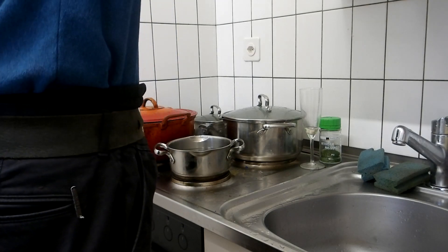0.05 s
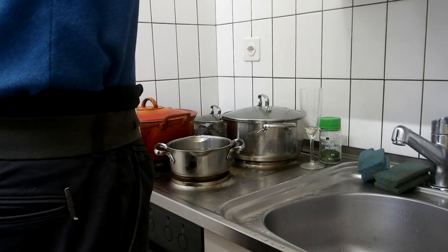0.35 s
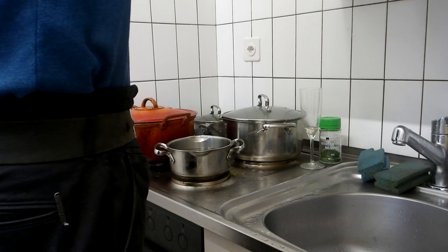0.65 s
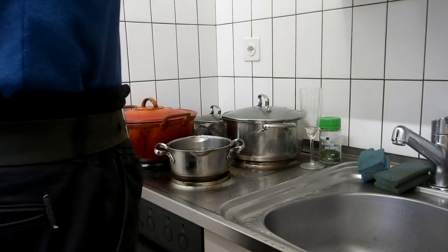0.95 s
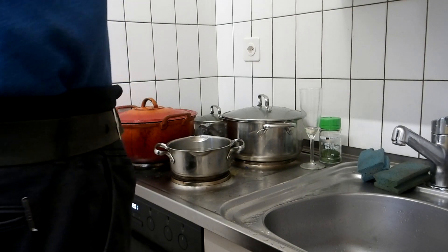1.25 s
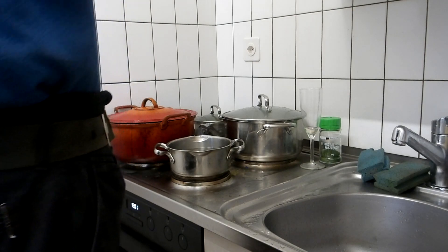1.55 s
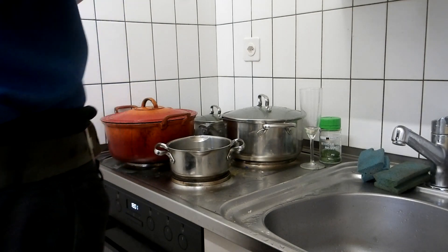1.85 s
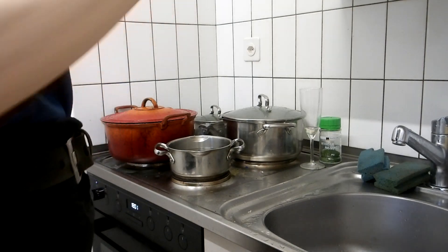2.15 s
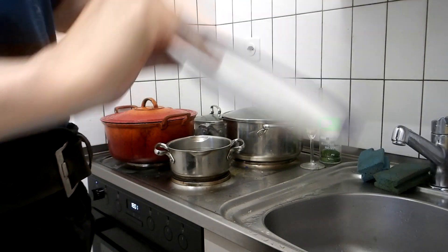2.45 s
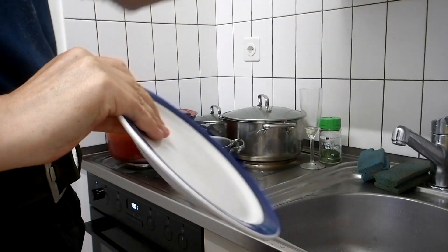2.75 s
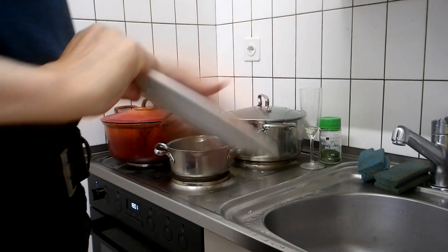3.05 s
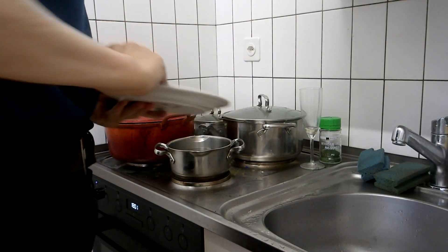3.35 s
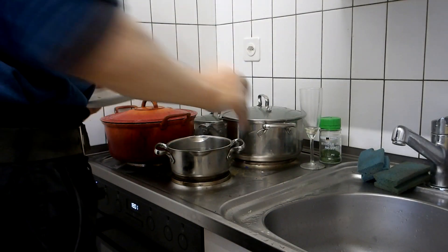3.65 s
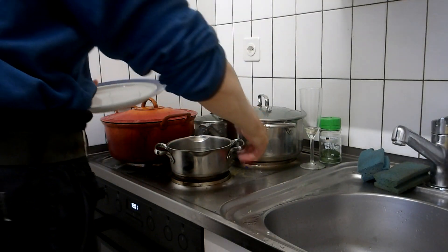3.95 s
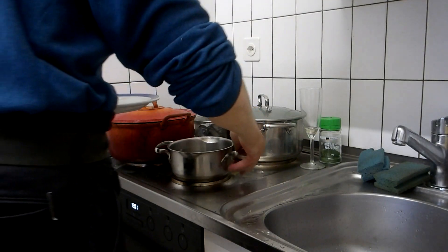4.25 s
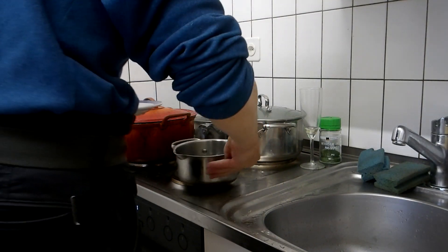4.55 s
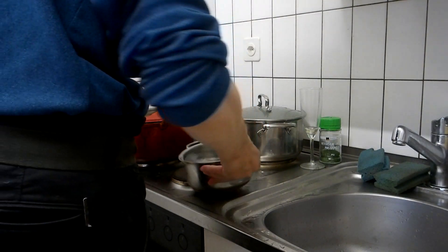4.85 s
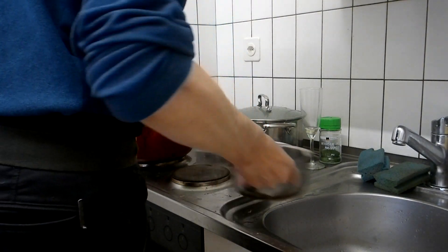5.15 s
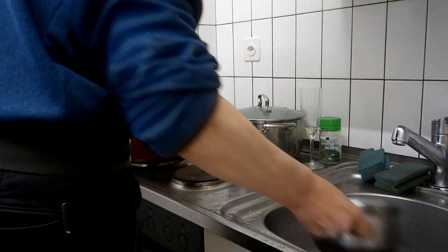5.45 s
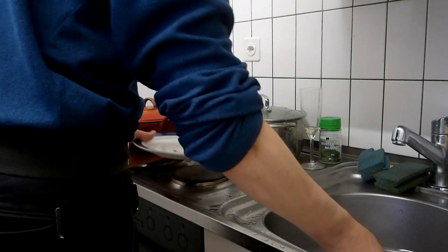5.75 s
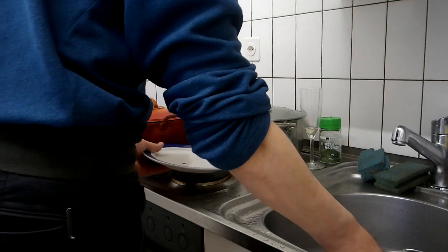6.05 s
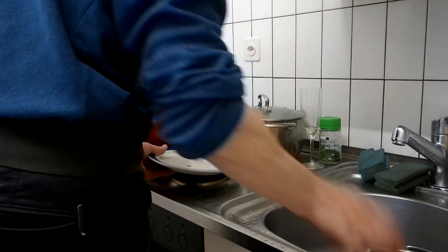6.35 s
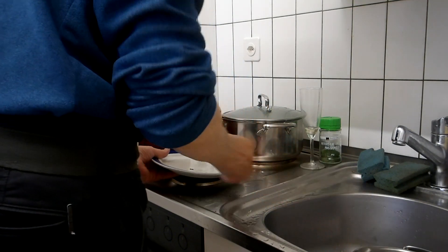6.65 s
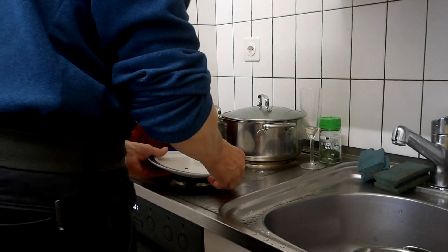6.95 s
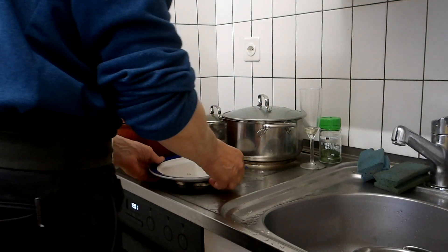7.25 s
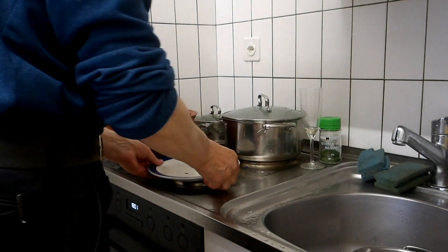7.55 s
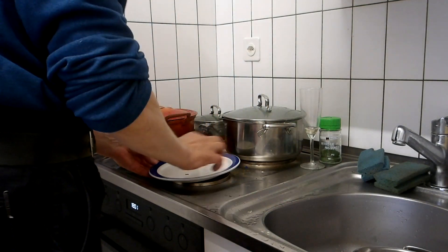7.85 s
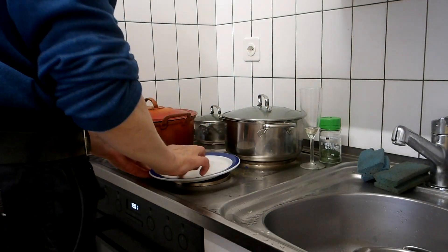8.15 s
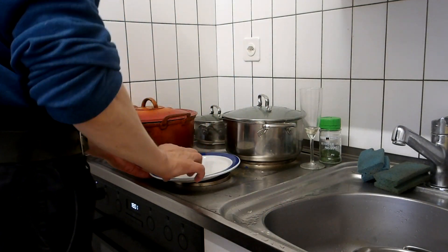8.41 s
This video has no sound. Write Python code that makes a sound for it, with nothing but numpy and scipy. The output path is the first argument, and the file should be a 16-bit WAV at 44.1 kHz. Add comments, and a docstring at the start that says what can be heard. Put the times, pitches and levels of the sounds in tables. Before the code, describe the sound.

Crockery clatters in a tiled kitchen, a dragged pot bangs into a steel sink, and a plate knocks and slides on the stovetop.

```python
"""Crockery and steel in a tiled kitchen

Dishes clink as a plate is taken out and a cupboard shuts; a steel pot is dragged off the stove and
clatters into the sink; the plate is knocked and slid onto the stovetop. Impacts excite free vibration
of each object's modes, friction drives the scrapes and a sleeve's rustle, and the tiles prolong both.
Hiss and faint ticks lie beneath, and the loudest blows overload the microphone."""
import sys
import numpy as np
from scipy import signal
from scipy.fft import rfft, irfft, next_fast_len
from scipy.io import wavfile

SR = 44100
rng = np.random.default_rng(int(sys.argv[2]) if len(sys.argv) > 2 else 0)


def bounce(signal):
    """Save signal as a 16-bit WAV file at the path given by the first command-line argument."""
    frames = np.transpose(np.atleast_2d(signal))
    limited = np.clip(frames, -1, 1)
    pcm = np.round(limited * 32767).astype(np.int16)
    wavfile.write(sys.argv[1], SR, pcm)


N = 382788
TIME = np.arange(N) / SR
RING_TIME = np.arange(2 ** 15) / SR

# Impacts on each object: start_s, relative_level_db, tilt_db_per_octave, clack_over_ring_db, chatter_s
STACK_IMPACTS = [(0.0, -15.5, 1, 3, .01), (.036, -0.5, 1, 4.5, 0.013), (.075, -10.5, 2.5, -5.5, 0.017),
                 (.2975, 0, 2.5, 4, 0.0098), (.395, -13.5, -3.5, -1.5, 0.0056), (.475, -10, 2.5, 3, .03),
                 (.569, -7.5, 2.5, 4, 0.011), (.620, -9.5, -0.5, 9.5, 0.025), (.882, -33.5, 4, 17, 0.0026)]
DISH_IMPACTS = [(1.0615, -27.5, 2, -10, 0.0029), (1.0925, 1.5, -1, 3, 0.0029),
                (1.1885, -5, -3.5, 2, 0.0083)]
CUPBOARD_IMPACTS = [(.03, -7.5, 0, 5, 0.011), (.4502, -2, -0.5, 12, .004), (.485, -4.5, 11.5, -28, 0.0135),
                    (.93, -24.5, -6, 8, 0.044), (1.0618, -7, -3.5, 12, 0.00926),
                    (1.095, -17, -5, -14, 0.0062), (2.812, -5, 0, 0, .012), (2.83, -11, -11, 1, 0.015),
                    (3.183, -29.5, 2, 4, .03)]
CATCH_IMPACTS = [(2.7915, -8.5, 0, 15, .002), (2.7946, -21, 2.1, 12, 0.00057), (2.803, -8, 0, 12, 0.019)]
POT_IMPACTS = [(4.088, -30, -4.5, 4, 0.0059), (4.195, -18, -5.5, 0.5, .03), (4.255, -21.5, -6.5, 14, 0.018),
               (4.395, -24.5, 3, 19, 0.0098), (4.847, -18, 0, 2, 0.019), (4.885, -38, -6, -2, 0.027)]
SINK_IMPACTS = [(5.7364, 6.5, 2.9, 8, .007), (5.763, 1, -1, 6.3, 0.013), (5.844, -1, 0.7, 8.2, 0.014),
                (5.891, -0.5, 1.3, 2.7, .022), (6.051, -12.5, -2.5, 10.5, .02),
                (6.11, -9.5, 1.3, 4.6, 0.028), (6.185, -5.5, -2.7, 9, 0.0068),
                (6.215, -10, 1.4, 5.2, 0.023)]
PLATE_IMPACTS = [(6.7095, -3.5, -1.2, 2.6, .012), (6.85, -18, -4.5, 6.2, 0.017),
                 (7.1918, 1.5, 1.6, 3.7, 0.0048), (7.8132, 1.5, 1.2, 0.95, .002),
                 (7.858, -11.5, 0, 8.6, 0.0054)]

# Distinct normal modes of each object: pitch_hz, relative_level_db, t60_s
STACK_RESONANCES = [(536, -11, 0.51), (916, -7, 1), (1133, -7, 1), (1510, -25, 0.73), (1625, -8, 1),
                    (1940, -24, 0.4), (2613, 12, 0.083), (2545, 6, 0.071), (2950, 4, 0.26),
                    (3100, -7, 0.24), (3330, -12, 0.24), (3530, -39, .3), (3700, -26, .3), (4060, 6, 0.067),
                    (3900, 2, 0.24), (5440, 0, 0.061), (6050, 1.5, 0.11), (6420, -25, 0.39),
                    (7400, -6, 0.47), (7520, -1.5, 0.18), (9180, -9, 0.13), (9740, -13, 0.25),
                    (10520, -22, 0.5), (12200, -29, .3), (12810, -41, .25)]
DISH_RESONANCES = [(1040, -31, .2), (1270, 2.5, 0.026), (1500, -4.5, 0.12), (1646, -6.5, 0.24),
                   (1935, -4, 0.058), (2620, -7, 0.072), (2638, 7, 0.1), (3050, -21, 0.16),
                   (3904, 0.5, 0.11), (4053, -8, 0.05), (5260, -9.5, 0.18), (5660, -38, .15),
                   (6600, -12, 0.53), (6860, -8, 0.38), (8500, -27, 0.23), (9180, -15, 0.3),
                   (11400, -32, .2)]
CUPBOARD_RESONANCES = [(93.5, -13.5, 0.23), (147, -9, 0.54), (187.5, 0.5, 0.16), (197, 5.5, 0.05),
                       (287.5, -6.5, 0.14), (336, -8, 0.39), (408, -4, 0.054), (549, -18, 0.24)]
CATCH_RESONANCES = [(6000, -2, 0.0073), (6760, 0, 0.0096)]
POT_RESONANCES = [(455, -8, 0.33), (689, -1, 0.22), (825, 2, 0.1), (1046, -1, 0.22), (1360, 3.5, 0.11),
                  (1487, -5, 0.11), (1604, 6, 0.082), (1817, -1, 0.073), (2257, 4.5, 0.067),
                  (3380, -5, 0.17), (6650, -6, 0.12)]
SINK_RESONANCES = [(105.4, -6.5, 0.17), (152, -8, 0.12), (181, -1, 0.09), (286, -10.5, .2),
                   (343.4, -5, 0.33), (430, -3, 0.54), (528, -3.5, 0.22), (587, -21, .15),
                   (616.5, -4.5, 0.29), (820, -23, 0.41), (990, -22, 0.22), (1340, -19, 0.63),
                   (1410, -17, 0.17), (2170, -12, 0.048), (3700, -23, 0.087), (6870, -18, .15)]
PLATE_RESONANCES = [(490, 3, 0.15), (796.5, 3.5, 0.41), (1050, -12, 0.14), (1161, 14.5, 0.033),
                    (1500, 2.5, 0.074), (1598, 8.5, 0.071), (1740, 1.5, 0.29), (2030, -21, 0.13),
                    (2520, 12, 0.065), (2640, 7.5, 0.091), (2730, 0.5, 0.3), (2714, 3, 0.1),
                    (3300, -25, 0.23), (4040, 11, 0.064), (4150, 7, 0.033), (5280, 3.5, 0.083),
                    (6140, 0, 0.15), (7000, -12, 0.29), (7150, 1, 0.3), (8770, -3, 0.097),
                    (9740, -6, 0.067), (9430, -4.5, 0.33), (10000, -22, 0.22), (11800, -35, .3),
                    (12220, -28, 0.2)]

# Spectra of the clack, the dense and quickly damped modes under a ring: frequency_hz, relative_density_db
STACK_SPECTRUM = [(80, -38), (200, -8.5), (600, 2.5), (1000, -5.5), (1600, 0), (1950, -4), (3000, -3.5),
                  (4400, -11.5), (4900, -13), (7000, -17), (9500, -21.5), (12000, -35.5), (16000, -58)]
DISH_SPECTRUM = [(80, -15), (200, -9.5), (700, -3), (1400, -6), (2600, -1), (3500, -4), (4800, -11),
                 (7000, -17), (9500, -19), (12000, -32), (16000, -57)]
CUPBOARD_SPECTRUM = [(30, -50), (70, -29), (120, -14.5), (190, -7), (550, 2), (850, -4), (1500, -14.5),
                     (3000, -16.5), (10000, -36)]
CATCH_SPECTRUM = [(500, 10), (2500, -18), (5000, -6.5), (7000, 3.5), (9500, -4.5), (11500, -21.5),
                  (16000, -27)]
SINK_SPECTRUM = [(40, -20), (110, -19), (280, -8), (550, 8), (1200, -3.5), (2000, -3), (3500, -5.5),
                 (5000, -12), (7500, -9), (9500, -11), (12000, -22), (16000, -38)]
PLATE_SPECTRUM = [(60, -22), (150, -8), (230, -19.5), (330, -1), (430, 3), (650, -2), (800, 5.5), (1100, 0),
                  (1550, 5), (2300, -3), (3300, -6.5), (4800, -17), (7000, -14), (9500, -32),
                  (12000, -30.5), (16000, -54)]

# Spectra of hiss, cloth, pot (struck or scraped) and stovetop: frequency_hz, relative_density_db
HISS_SPECTRUM = [(25, -44), (60, -14), (120, -3.5), (230, -0.5), (450, -1.5), (900, -4.5), (1500, -2),
                 (2000, -5), (2700, -11), (5000, -14.5), (7000, -15.5), (8200, -12), (9500, -14.5),
                 (15500, -22.5)]
CLOTH_SPECTRUM = [(150, -35), (400, 7), (1000, 6), (2500, 8), (4700, 11), (7000, 5), (10000, -4),
                  (15000, -28)]
POT_SPECTRUM = [(60, -28), (150, -18.5), (250, -24.5), (420, -3.5), (1300, -4), (2000, -6), (2950, -13),
                (3500, -8.5), (5000, -13.5), (7000, -11.5), (10000, -16.5), (11500, -29), (16000, -42)]
STOVE_SPECTRUM = [(100, -40), (300, -23.5), (430, -5.5), (560, -0.5), (690, -15), (900, -5.5), (1150, -7.5),
                  (1400, -18), (2200, -22), (3300, -25), (7000, -35), (14000, -47)]

# Brief tones of a rubbed plate rim: peak_s, level_db, swell_s, t60_s
RIM_TONES = [(.68, -24.5, 0.046, 0.36), (3.245, -39.5, 0.012, 0.077)]

# Strokes of rubbing and sliding: start_s, length_s, relative_level_db
SLEEVE_STROKES = [(2.44, 0.9, -41.5), (3.33, 0.3, -52.5), (4.9, 0.39, -46.5), (6.44, 0.35, -48.5),
                  (6.87, 0.14, -44.5), (8.53, 0.81, -46.5)]
POT_STROKES = [(4.115, 0.82, -32.5), (4.843, 0.08, -29.5)]
PLATE_STROKES = [(6.985, .22, -29.5), (7.46, .15, -31.5), (7.63, .11, -34.5)]

# Reverberation time of the kitchen: frequency_hz, t60_s
KITCHEN_DECAY = [(100, 0.41), (400, 0.47), (1500, 0.39), (4000, 0.47), (9000, 0.4), (15000, 0.22)]


def undb(db):
    """Amplitude ratio of a level in decibels."""
    return np.exp(np.asarray(db) * (np.log(10) / 20))


def unit_energy(x):
    """Normalisation to an energy of one."""
    return x / np.sqrt(np.sum(x ** 2))


def at_hz(points, hz):
    """Interpolation of (frequency_hz, value) points on a logarithmic frequency axis."""
    frequencies, values = np.transpose(points)
    return np.interp(np.log(np.maximum(hz, 1)), np.log(frequencies), values)


def colour(x, spectrum, tilt_db=0):
    """Spectral shaping with a tilt per octave; the result has an rms of one."""
    size = next_fast_len(len(x))
    hz = np.maximum(np.fft.rfftfreq(size, 1 / SR), 1)
    gain = undb(at_hz(spectrum, hz) + tilt_db * np.log2(hz))
    shaped = irfft(rfft(x, size) * gain, size)[:len(x)]
    return shaped / np.std(shaped)


def decay(t60, t=RING_TIME):
    """Exponential damping: the amplitude falls 60 dB in t60 seconds."""
    return np.exp(-np.log(1000) * t / max(t60, 1e-3))


def add(out, start_s, x):
    """Superposition of a sound from a given time on."""
    start = max(int(start_s * SR), 0)
    out[start:start + len(x)] += x[:N - start]


def background(hiss_db=-49, tick_db=-34, tick_hz=300):
    """Steady broadband noise, with a pair of damped sinusoids ticking once a second."""
    out = colour(rng.standard_normal(N), HISS_SPECTRUM) * undb(hiss_db)
    tick = undb(tick_db) * np.sin(2 * np.pi * tick_hz * RING_TIME) * decay(t60=0.015)
    for second in range(int(N / SR) + 1):
        add(out, second + 0.356, tick)
        add(out, second + 0.486, tick * undb(-3))
    return out


def ring(modes, tilt_db, scatter_db=1, split=0.00424, rise_s=0.00069):
    """Free vibration: close pairs of modes beat, and the point of impact decides each pair's share."""
    out = np.zeros(len(RING_TIME))
    for (hz, db, t60), (share, detune) in zip(modes, rng.standard_normal((len(modes), 2))):
        t = RING_TIME[:int(2 * t60 * SR) + 2]
        phase = 2 * np.pi * hz * t
        pair = np.sin(phase) + np.sin(phase * (1 + split * detune))
        gain = np.sign(detune) * undb(db + tilt_db * np.log2(hz) + scatter_db * share)
        add(out, 0, gain * unit_energy(pair * decay(t60, t)))
    return unit_energy(out * (1 - np.exp(-RING_TIME / rise_s)))


def contact_force(chatter_s, rebound=0.21, count=12):
    """Contact chatter: one hard impulse, then a run of smaller ones as the rim settles."""
    force = np.zeros(int(chatter_s * SR) + 2)
    touches = (rng.random(count) * (len(force) - 1)).astype(int) + 1
    force[touches] = rebound * rng.standard_normal(count)
    force[0] = 1
    return force


def reverberate(x, wet_db=0, gap_s=0.0014, build_s=0.0065):
    """Reverberation: dense reflections from the tiles follow the direct sound; high treble dies first."""
    noise = rfft(rng.standard_normal(len(RING_TIME)))
    hz = np.fft.rfftfreq(len(RING_TIME), 1 / SR)
    centres, t60s = np.transpose(KITCHEN_DECAY)
    bands = [at_hz(np.c_[centres, weights], hz) for weights in np.eye(len(t60s))]
    tail = sum(irfft(noise * band) * decay(t60) for band, t60 in zip(bands, t60s))
    onset = np.clip((RING_TIME - gap_s) / build_s, 0, 1)
    return x + undb(wet_db) * signal.fftconvolve(x, unit_energy(tail * onset))[:len(x)]


def impacts(hits, modes, spectrum, clack_t60, low_hz, gain_db, wet_db):
    """Impulsive excitation: each blow yields a clack of dense modes, a clear ring and its own echoes."""
    out, size = np.zeros(N), len(RING_TIME)
    radiation = signal.butter(3, low_hz, "high", fs=SR, output="sos")  # small bodies radiate little bass
    for start_s, db, tilt_db, clack_db, chatter_s in hits:
        attack_s = 0.000088 + 0.033 * chatter_s  # a long chatter starts softly
        envelope = decay(clack_t60) * (1 - np.exp(-RING_TIME / attack_s))
        dense_modes = colour(rng.standard_normal(size), spectrum, tilt_db) * envelope
        clack = unit_energy(signal.fftconvolve(dense_modes, contact_force(chatter_s))[:size])
        vibration = ring(modes, tilt_db, rise_s=0.16 * chatter_s) + undb(clack_db) * clack
        heard = reverberate(signal.sosfilt(radiation, vibration), wet_db)
        add(out, start_s, undb(db + gain_db) * unit_energy(heard))
    return out


def dish_clinks():
    """Collisions excite the high, lightly damped modes of a stack of china and of a single dish."""
    stack = impacts(STACK_IMPACTS, STACK_RESONANCES, STACK_SPECTRUM,
                    clack_t60=0.064, low_hz=200, gain_db=22, wet_db=1.5)
    dish = impacts(DISH_IMPACTS, DISH_RESONANCES, DISH_SPECTRUM,
                   clack_t60=0.032, low_hz=190, gain_db=21.5, wet_db=-2.5)
    return stack + dish


def cupboard_knocks():
    """Modal frequency falls with size: the cupboard thuds and its small catch clicks."""
    cupboard = impacts(CUPBOARD_IMPACTS, CUPBOARD_RESONANCES, CUPBOARD_SPECTRUM,
                       clack_t60=0.067, low_hz=77, gain_db=15.5, wet_db=-2)
    catch = impacts(CATCH_IMPACTS, CATCH_RESONANCES, CATCH_SPECTRUM,
                    clack_t60=0.036, low_hz=790, gain_db=16.5, wet_db=-5)
    return cupboard + catch


def singing_rim(pitch_hz=1500):
    """Friction feeds one mode of a plate's rim, which swells and then decays freely."""
    envelope = np.zeros(N)
    for peak_s, db, swell_s, t60 in RIM_TONES:
        t = TIME - peak_s
        envelope += undb(db) * np.where(t < 0, np.exp(-(t / swell_s) ** 2), decay(t60, np.abs(t)))
    return envelope * np.sqrt(2) * np.sin(2 * np.pi * pitch_hz * TIME)


def friction(slips_per_s, spread_db, uneven_db):
    """Stick-slip friction: random impulses of unequal size under wavering pressure; rms of one."""
    slips = (rng.random(N) < slips_per_s / SR) * rng.standard_normal(N)
    slips *= undb(spread_db * np.minimum(rng.exponential(size=N), 4))
    pressure = np.interp(TIME, np.linspace(0, N / SR, 400), rng.standard_normal(400))
    slips *= undb(uneven_db * pressure)
    return slips / np.std(slips)


def stroke_pressure(strokes, rise, fall, sag_db_per_s):
    """Contact pressure builds, eases and lets go; rise and fall are fractions of a stroke's length."""
    out = np.zeros(N)
    for start_s, length_s, db in strokes:
        t = np.arange(int(length_s * SR)) / SR
        shape = np.clip(np.minimum(t / rise, (length_s - t) / fall) / length_s, 0, 1)
        add(out, start_s, shape * undb(db - sag_db_per_s * t))
    return out


def sleeve_rustle():
    """Friction between cloth fibres makes broadband noise each time the arm moves."""
    fibres = friction(slips_per_s=6000, spread_db=2, uneven_db=1.5)
    pressure = stroke_pressure(SLEEVE_STROKES, rise=0.11, fall=0.28, sag_db_per_s=23.5)
    return colour(fibres, CLOTH_SPECTRUM) * pressure


def pot_knocks():
    """Impacts against the stove set the pot's steel wall into free vibration."""
    return impacts(POT_IMPACTS, POT_RESONANCES, POT_SPECTRUM,
                   clack_t60=0.17, low_hz=302, gain_db=24.5, wet_db=0.5)


def wander(step_s, spread_db):
    """Slow amplitude modulation: a gain that drifts between random levels."""
    return undb(spread_db * np.interp(TIME / step_s, np.arange(200), rng.standard_normal(200)))


def resonate(force, hz, t60):
    """Forced vibration of one mode, scaled to take the same energy from noise whatever its damping."""
    quality = np.pi * hz * t60 / np.log(1000)
    return np.sqrt(t60) * signal.lfilter(*signal.iirpeak(hz, quality, fs=SR), force + 1e-12)


def pot_drag(grit_db=-4, ring_db=-11):
    """Friction on the hotplate drives the pot's modes; each swells and fades as the contact wanders."""
    slips = friction(slips_per_s=1300, spread_db=1.5, uneven_db=2.3)
    slips *= stroke_pressure(POT_STROKES, rise=0.072, fall=0.16, sag_db_per_s=1.5)
    wall = sum(undb(db) * wander(step_s=0.12, spread_db=8) * resonate(slips, hz, t60)
               for hz, db, t60 in POT_RESONANCES)
    grit = colour(slips, POT_SPECTRUM)
    return np.std(slips) * (undb(grit_db) * grit + undb(ring_db) * wall / np.std(wall))


def sink_clatter():
    """Repeated impacts of the pot excite the basin's low modes beneath a broadband clack."""
    return impacts(SINK_IMPACTS, SINK_RESONANCES, SINK_SPECTRUM,
                   clack_t60=0.13, low_hz=86, gain_db=14, wet_db=-4)


def plate_knocks():
    """A struck plate rings in inharmonic modes."""
    return impacts(PLATE_IMPACTS, PLATE_RESONANCES, PLATE_SPECTRUM,
                   clack_t60=0.13, low_hz=206, gain_db=21.5, wet_db=-1)


def plate_slide(stove_db=-4, ring_db=-9):
    """Sliding friction drives both bodies: in short pushes the stovetop drones and the plate whispers."""
    slips = friction(slips_per_s=4000, spread_db=2, uneven_db=2)
    china = signal.fftconvolve(slips, ring(PLATE_RESONANCES, tilt_db=-0.5))[:N]
    pressure = stroke_pressure(PLATE_STROKES, rise=0.14, fall=0.22, sag_db_per_s=3)
    return (undb(stove_db) * colour(slips, STOVE_SPECTRUM) + undb(ring_db) * china) * pressure


def limiter(x, threshold_db=-9, response_s=0.013):
    """Gain control follows the mean power, too slowly for the first instants of a blow."""
    memory = np.exp(-1 / (response_s * SR))
    rms = np.sqrt(signal.lfilter([1 - memory], [1, -memory], x ** 2))
    return x / np.maximum(rms / undb(threshold_db), 1)


def scene():
    """Superposition of knocks, rubbing and background in one tiled room, as a single channel."""
    knocks = dish_clinks() + cupboard_knocks() + pot_knocks() + sink_clatter() + plate_knocks()
    rubbing = reverberate(sleeve_rustle() + pot_drag() + plate_slide())
    return (knocks + rubbing + singing_rim() + background())[None]


def record(dry, notch_hz=7870, top_hz=15800):
    """Cancellation at the microphone's port notches the treble; overload limits and clips loud blows."""
    notched = signal.lfilter(*signal.iirnotch(notch_hz, Q=4.5, fs=SR), dry)
    notched += undb(-20) * (dry - notched)  # the notch is 20 dB deep
    clipped = np.clip(limiter(notched), -1, 1)
    low_pass = signal.ellip(10, 0.2, 70, top_hz, fs=SR, output="sos")
    return signal.sosfilt(low_pass, clipped)


dry = scene()
out = record(dry)
bounce(out)
```